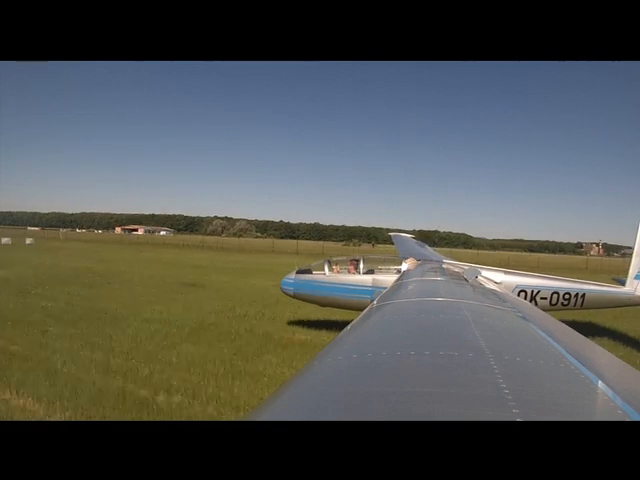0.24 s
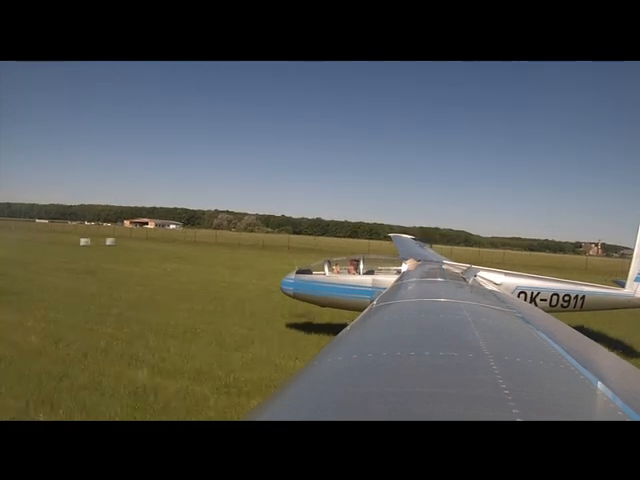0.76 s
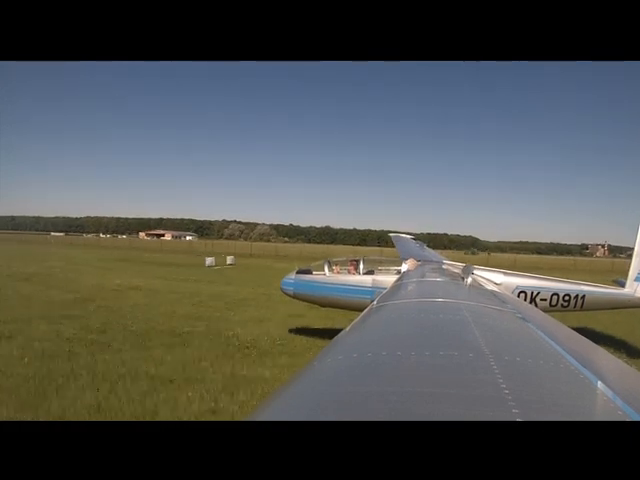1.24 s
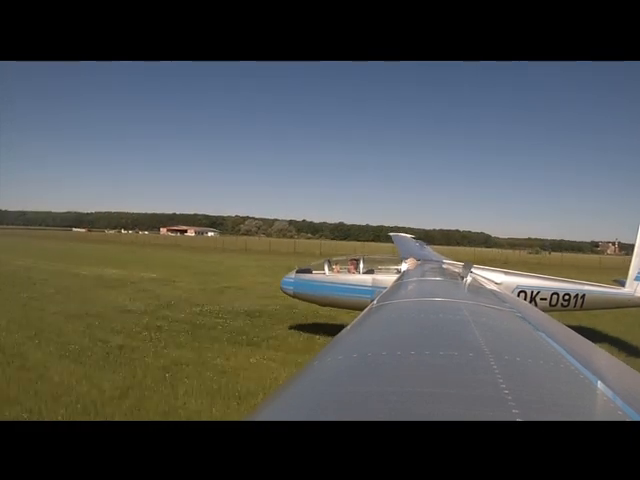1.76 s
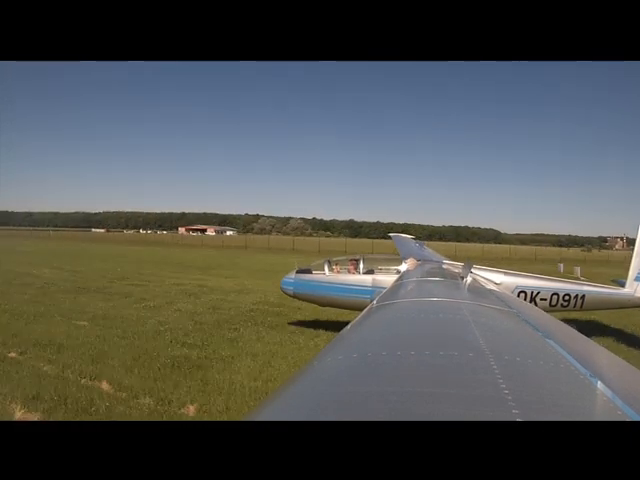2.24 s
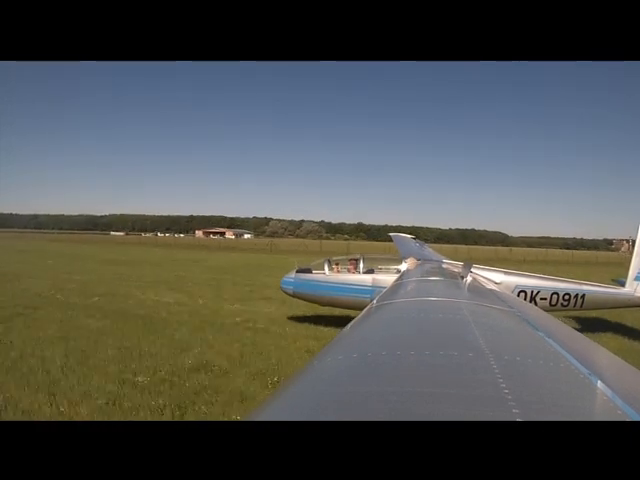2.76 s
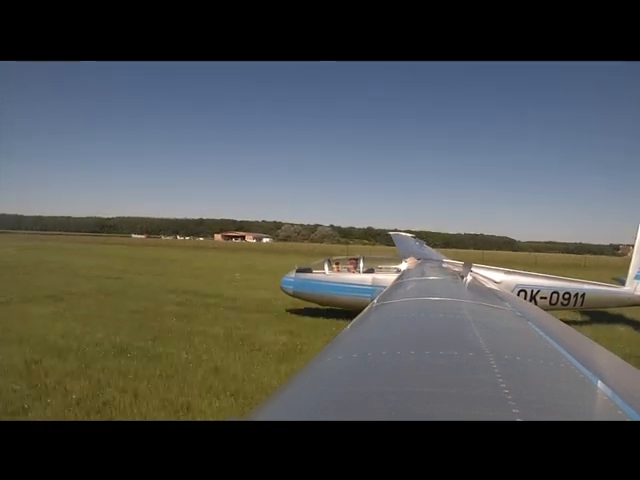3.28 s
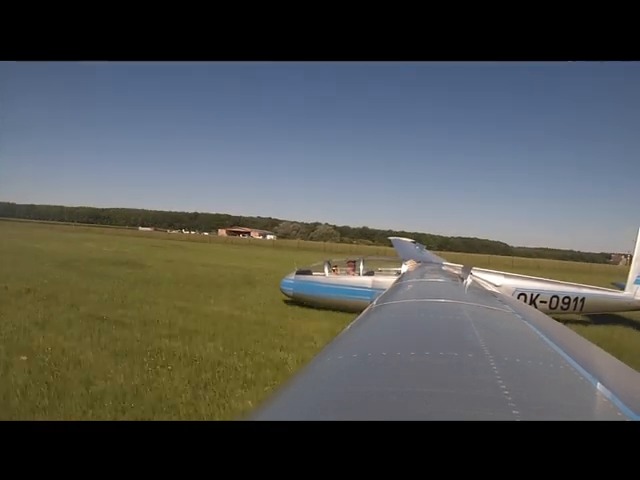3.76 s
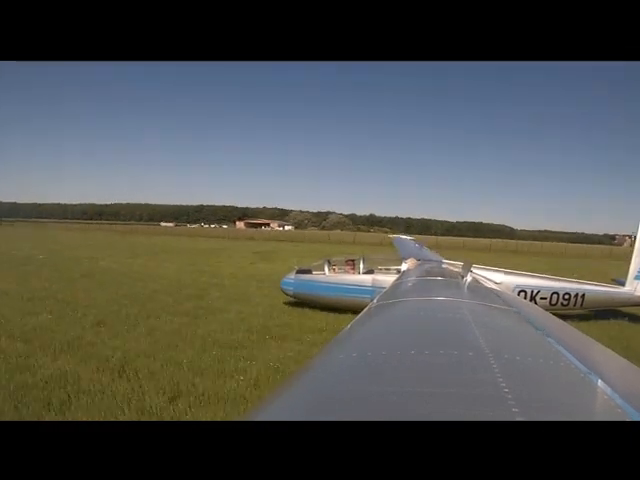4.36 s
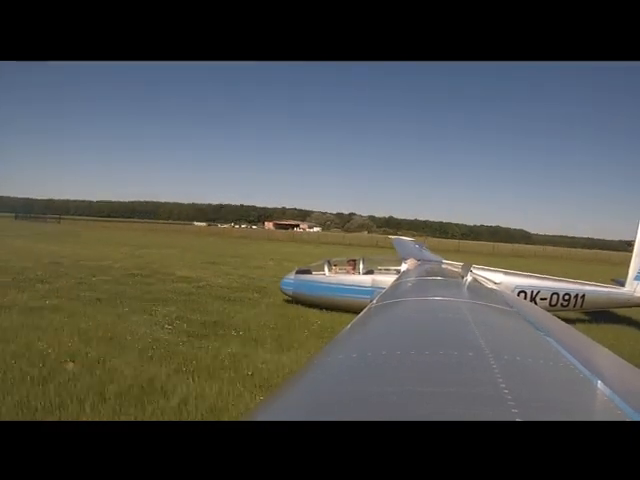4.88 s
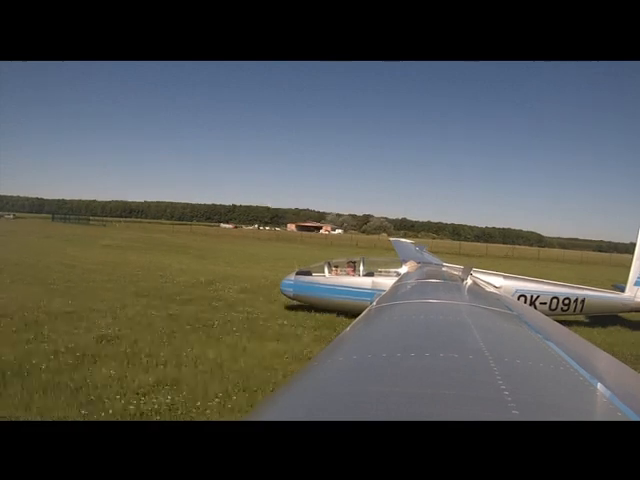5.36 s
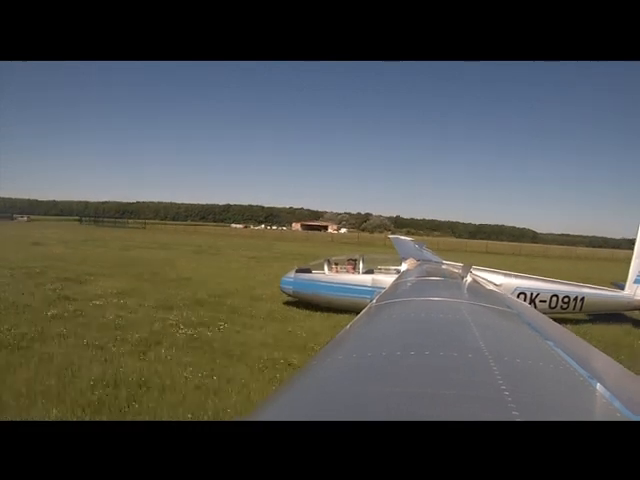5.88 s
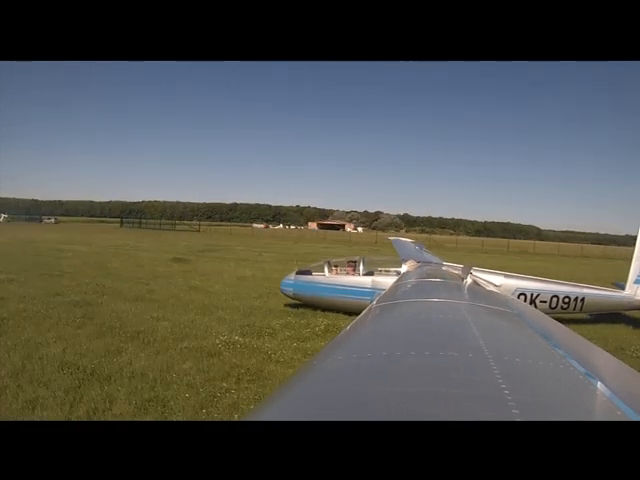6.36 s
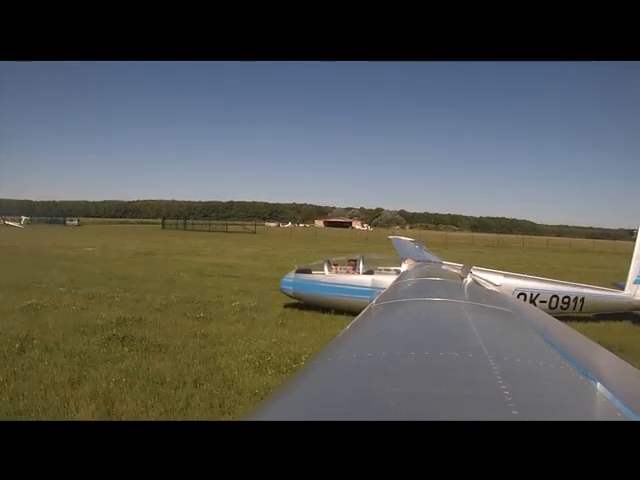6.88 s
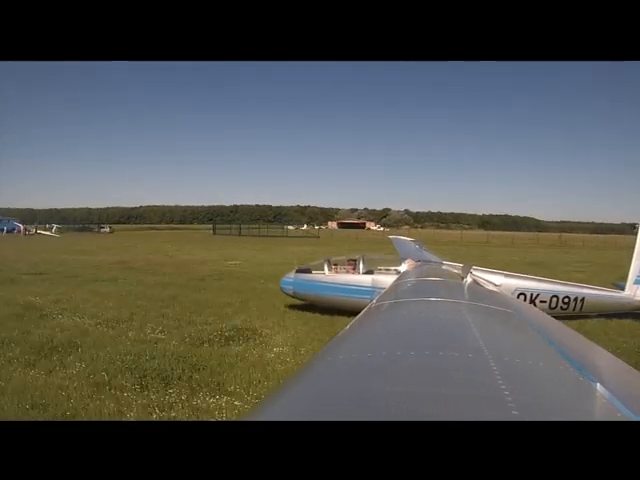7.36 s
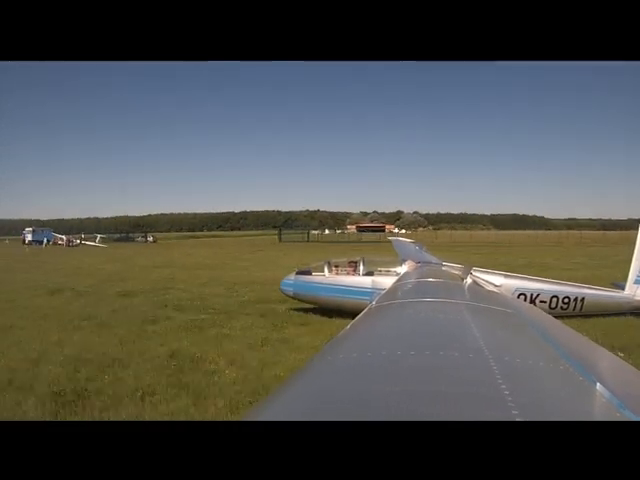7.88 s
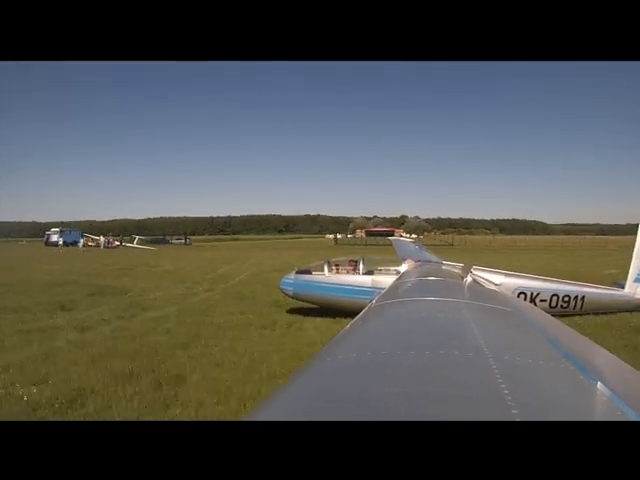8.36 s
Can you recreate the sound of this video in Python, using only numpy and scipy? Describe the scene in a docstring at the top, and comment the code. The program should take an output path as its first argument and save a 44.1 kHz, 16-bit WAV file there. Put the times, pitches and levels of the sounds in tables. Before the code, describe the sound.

Close on a glider's metal wing, a deep flutter and hollow drone roll across a grass field. A wheel brake sings a wavering high whine with gritty scraping, surging at each grab. Around four seconds it rasps and lets go; then the wheel rolls free, grass brushing softly, hard bumps thumping through the airframe, fittings ticking, wind buffeting the microphone.

```python
"""A glider's metal wing flutters, booms and drones as it rolls out over a grass field, heard on the wing.
The wheel brake scrapes, whines and rasps, then lets go, and grass brushes the wheel.
Hard bumps thump through the airframe, fittings tick, and wind buffets the microphone.
Ringing, rubbing and wind are shaped noise, the whine is two sines, and each thump is one smooth pulse.
A limiter ducks the whole sound after strong peaks."""
import sys
import numpy as np
from scipy import signal
from scipy.fft import rfft, irfft
from scipy.io import wavfile
from scipy.ndimage import uniform_filter1d

SR = 44100
rng = np.random.default_rng(int(sys.argv[2]) if len(sys.argv) > 2 else 0)


def inscribe(sig):
    """Save sig as 16-bit PCM at rate SR to the path in sys.argv[1].

    A 1-D sig is mono; a 2-D sig holds one channel per row.
    Samples are clipped to [-1, 1] before scaling.
    """
    pcm = np.round(np.clip(np.atleast_2d(sig).T, -1, 1) * 32767)
    wavfile.write(sys.argv[1], SR, pcm.astype(np.int16))


N = 380583
TIME = np.arange(N) / SR
FREQS = np.fft.rfftfreq(N, 1 / SR)

# Roughness of the turf, as the level at which it keeps the hollow wing droning,
# before hummocks and chance: (time [s], level [dB])
TURF = [(0, -28), (3.4, -26), (4.7, -25.5), (5.45, -28.5), (5.6, -30), (6.05, -32.5), (6.35, -27.5),
        (7.3, -28.5), (8.2, -21.5), (8.62, -25)]
# The wheel rides over hummocks:
# (time [s], length at half height [s], boom lift [dB], drone lift [dB], grass lift [dB])
HUMMOCKS = [(0.18, .16, 4, 3, 0), (1.08, 0.12, 5.5, -4, 0), (1.74, 0.22, 3, 1.5, 0),
            (2.26, 0.065, 4.5, 0.5, 0), (3.42, 0.23, 5.5, 0.5, 0), (3.72, 0.15, 6, 5.5, -6.5),
            (4.14, 0.052, 1.5, 4, 2), (4.3, 0.094, 4.5, 4, -0.5), (4.5, .06, 1, -0.5, 2.8),
            (4.61, 0.095, 2, 2, -1.5), (4.73, 0.045, -12, 8, 5), (4.85, 0.057, 6, 4, 1.5),
            (5.05, 0.052, 10, 1.5, 4.5), (5.25, 0.049, -6, 9.5, 0.5), (5.44, 0.11, -1, 10.5, 5),
            (6.0, 0.1, 4.5, -2, 0.5), (6.37, 0.25, 1.5, 6, 2.5), (6.53, 0.038, 3.5, 5, 3.5),
            (6.75, 0.17, 1, 6, 3.5), (7.04, 0.082, -3, 12, -0.5), (7.35, 0.044, -7, 6.5, 2),
            (7.62, 0.15, 5.5, -3.5, 2), (8.46, 0.11, 2, -0.5, 2.5)]
# The brake pad grabs; the whine takes the full lift, its octave and the scrape only a share:
# (time [s], length at half height [s], lift [dB])
GRABS = [(0.03, 0.087, 4), (0.37, 0.094, 5), (0.64, 0.094, 2), (1.01, 0.067, 3.5), (1.49, .2, 3.5),
         (1.95, 0.17, 6), (2.49, 0.15, 4.5), (2.66, 0.065, 3.5), (3.0, 0.12, 8.5), (3.92, 0.075, 10.5)]
# The pad loses its last touch: from, to [s]
PAD_CLEAR = [3.96, 4.06]


def gain_of(db):
    """Turns decibels into amplitude."""
    return 10 ** (np.asarray(db) / 20)


def evened(x):
    """Scales to an rms of 1."""
    return x / np.sqrt(np.mean(x ** 2) + 1e-20)


def curves(rows):
    """Draws each column of a timed table as a curve with a value at every sample."""
    s, *columns = np.transpose(rows)
    return [np.interp(TIME, s, c) for c in columns]


def swells(rows):
    """Bell-shaped swells from rows (time, length at half height, height, ..): one curve per height."""
    s, length, *heights = np.transpose(rows)
    coarse = TIME[::64]  # slow curves need few points
    bells = 0.5 ** ((2 * (coarse - s[:, None]) / length[:, None]) ** 2)
    return [np.interp(TIME, coarse, h @ bells) for h in heights]


def spectrum(points):
    """Joins a few (frequency, dB) points on a log-frequency axis."""
    hz, db = np.transpose(points)
    return np.interp(np.log(FREQS + 1), np.log(hz + 1), db)


def filtered(x, gain):
    """Applies one gain per frequency."""
    return irfft(rfft(x) * gain, N)


def noise(gain):
    """Coloured noise with an rms of 1."""
    return evened(filtered(rng.standard_normal(N), gain))


def wobble(rate_hz):
    """Slow chance movement up to about the given rate, with an rms of 1."""
    return noise(1 / (1 + (FREQS / rate_hz) ** 4))


def add(mix, s, sound):
    """Mixes a sound in at time s, cut off at the end of the mix."""
    part = mix[round(s * SR):][:len(sound)]
    part += sound[:len(part)]


def released():
    """How free the wheel is: 0 while the brake is on, 1 once it rolls free."""
    brake_off = [3.69, 3.88]  # from, to [s]
    return np.interp(TIME, brake_off, [0, 1])


def ringing(modes, hold=0.1):
    """Modes kept ringing by random jolts, at a level that stays fairly even over the hold time [s]."""
    gain = 0
    for hz, width, db in modes:
        gain = gain + gain_of(db) / (1 + (2 * (FREQS - hz) / width) ** 2) ** 1.55
    x = noise(gain)
    power = abs(uniform_filter1d(x ** 2, int(hold * SR)))
    return x / np.sqrt(power + 0.022)


def wing(bounce_db=-5, boom_uneven_db=1.5, drone_uneven_db=1.93, uneven_hz=12):
    """The wing flutters, booms and drones; once the brake lets go, the wheel bounces on its tyre."""
    # Modes of wing, airframe and tyre: (frequency [Hz], width [Hz], level within its group [dB])
    flutter_modes = [(23.87, 3.55, 2.5)]
    boom_modes = [(66.56, 11.1, -1.5), (104.3, 11, -18.5)]
    drone_modes = [(176.75, 23, 1), (152.5, 21.5, -5.5)]
    tyre_modes = [(39.8, 16.6, 0)]
    # Base levels: (with the brake on [dB], rolling free [dB])
    flutter_levels = (-24, -18.5)
    boom_levels = (-20.5, -25)
    sway_peak_s, sway_period_s, sway_db = 0.76, 1.22, 3

    free = released()
    boom_lift, drone_lift, _ = swells(HUMMOCKS)

    # Under braking the wing sways, and its flutter swells once in each sway.
    sway = sway_db * (1 - free) * np.cos(2 * np.pi * (TIME - sway_peak_s) / sway_period_s)
    bounce = gain_of(bounce_db) * free * ringing(tyre_modes, hold=0.32)  # level relative to the flutter
    flutter_level = np.interp(free, [0, 1], flutter_levels) + sway
    flutter = gain_of(flutter_level) * (ringing(flutter_modes, hold=0.117) + bounce)

    boom_level = np.interp(free, [0, 1], boom_levels) + boom_lift + boom_uneven_db * wobble(uneven_hz)
    boom = gain_of(boom_level) * ringing(boom_modes, hold=0.11)

    drone_level = curves(TURF)[0] + drone_lift + drone_uneven_db * wobble(uneven_hz)
    drone = gain_of(drone_level) * ringing(drone_modes, hold=0.12)
    return flutter + boom + drone


def skin_gain():
    """The colour that the metal wing gives to whatever rubs or ticks on it."""
    # Rubbing as the wing passes it on: (frequency [Hz], relative level [dB per Hz])
    rub_colour = [(50, -3), (100, 1), (200, -5), (300, -8), (620, -8), (820, -10), (980, -14), (1500, -6.5),
                  (2300, -12.5), (3200, -23), (5400, -29), (5900, -31), (8200, -29.5), (9900, -40),
                  (12500, -41), (15000, -54)]
    # Resonances of the metal skin: (frequency [Hz], width [Hz], lift [dB])
    skin = [(240.3, 12.3, 6), (1139, 52, 5), (1420, 356, 8), (1838, 56, 4), (2227, 42, 4.5), (2565, 166, 5),
            (2970, 250, 3), (3550, 126, 4.5), (4270, 126, 5.5), (4814, 240, 6), (5340, 360, 7),
            (6940, 1240, 3.5), (8100, 260, 2), (9700, 400, 3.5), (11160, 800, 4)]
    lift_db = sum(db / (1 + (2 * (FREQS - hz) / width) ** 2) for hz, width, db in skin)
    return evened(gain_of(spectrum(rub_colour) + lift_db))


def rubbing(grab_share=0.41, judder_db=1.15, grit_db=1.0, treble_hz=3100, drag_db=-14,
            treble_start_db=-0.74, brighten_db_per_s=0.47):
    """The brake scrapes ever brighter, then drags lightly until it clears; grass brushes the free wheel."""
    # How hard the brake scrapes, before grabs and release: (time [s], level [dB])
    scrape = [(0, -20), (1.2, -21), (1.8, -19.5), (2.6, -21), (3.2, -19), (3.42, -22), (3.7, -21)]
    # Grass brushing the wheel, before the hummocks: (time [s], level [dB])
    grass_levels = [(3.9, -36), (4.4, -34.5), (5.0, -32), (5.3, -36.5), (5.7, -39), (6.6, -39), (7.4, -39),
                    (8.6, -37.5)]
    # With the brake off, grass on the tyre shifts the colour: (frequency [Hz], shift [dB])
    grass_tint = [(200, -1.5), (380, 1), (600, -0.5), (1100, 1), (1500, -2.5), (3000, 1), (6000, 0),
                  (14000, -0.5)]

    free = released()
    _, _, grass_lift = swells(HUMMOCKS)
    touching = np.interp(TIME, PAD_CLEAR, [1, 0])

    brake_level = curves(scrape)[0] + grab_share * swells(GRABS)[0] + drag_db * free
    brake = touching * gain_of(brake_level) * noise(skin_gain())
    grass_level = curves(grass_levels)[0] + grass_lift
    grass = np.sqrt(free) * gain_of(grass_level) * noise(skin_gain() * gain_of(spectrum(grass_tint)))
    hiss = brake + grass

    fizz = filtered(hiss, 1 / (1 + (treble_hz / (FREQS + 1)) ** 12))  # the treble part
    body = (hiss - fizz) * gain_of(grit_db * wobble(180))  # below the treble it is grittier
    bright = gain_of((1 - free) * (treble_start_db + brighten_db_per_s * TIME))
    return (body + bright * fizz) * gain_of(judder_db * wobble(13.8))


def whine(jitter_hz=2.51, low_flicker_db=-0.8, octave_flicker_db=1.83, octave_grab_share=0.85,
          sharpen_hz_per_db=0.46):
    """The brake sings, louder and sharper at each grab; its octave, near a skin resonance, flickers more."""
    # Strength between grabs: (time [s], fundamental level [dB], octave level [dB])
    strength = [(0, -27.5, -20), (1.4, -28.5, -21.5), (1.78, -31, -25), (2.3, -28.5, -23.5),
                (2.85, -29.5, -26), (3.04, -31.5, -27.5), (3.07, -38.5, -37), (3.62, -37.5, -40),
                (3.78, -49, -55), (4.0, -45, -49)]
    # Pitch between grabs: (time [s], frequency [Hz])
    pitch = [(0, 678), (0.3, 677), (0.85, 672), (1.25, 674.5), (1.7, 670.5), (2.0, 673), (3.0, 675.5)]

    first_db, second_db = curves(strength)
    grab = swells(GRABS)[0]
    hz = curves(pitch)[0] + sharpen_hz_per_db * grab + jitter_hz * wobble(43)
    phase = 2 * np.pi * np.cumsum(hz) / SR

    low_level = first_db + grab + low_flicker_db * wobble(35)
    low = gain_of(low_level) * np.sin(phase)
    # The octave flickers by chance, faster and deeper than the fundamental.
    octave_level = second_db + octave_grab_share * grab + octave_flicker_db * wobble(71)
    octave = gain_of(octave_level) * np.sin(2 * phase)
    touching = np.interp(TIME, PAD_CLEAR, [1, 0])
    return np.sqrt(2) * (low + octave) * touching  # the root makes the levels rms levels


def rasp(rasp_db=-27.0, flicker_db=2.0, flicker_hz=25):
    """As the whine breaks down the pad chatters: wavering noise bands, the strongest near its octave."""
    # Skin resonances that the pad rasps in: (frequency [Hz], width [Hz], relative level [dB])
    rasp_modes = [(408, 100, -4), (1454, 182, 0)]
    # When it rasps: (time [s], length at half height [s], share of full amplitude)
    rasp_swell = [(3.28, 0.58, 0.84)]
    level = gain_of(rasp_db + flicker_db * wobble(flicker_hz))
    return level * swells(rasp_swell)[0] * (1 - released()) * ringing(rasp_modes)


def bumps(ring_hz=182, ring_t60=0.16, rise=0.0055, crunch_hz=450, crunch_length=0.0083):
    """Each bump crunches the turf and gives one heavy shove; the wing rings with it and fades (times [s])."""
    # The wheel hits bumps; the ring level is before its soft rise and its decay:
    # (time [s], thump level [dB], thump length [s], wing ring level [dB], crunch level [dB])
    bump_rows = [(3.672, -5.5, 0.024, -9, -25), (5.066, -7, 0.035, -29, -31),
                 (5.175, -5.5, 0.0083, -28, -34), (5.411, -0.5, 0.023, -17, -44),
                 (6.852, 0.5, .015, -31, -37), (7.704, -4.5, 0.0077, -17, -33), (7.732, 2, 0.015, -38, -40),
                 (8.12, -12, 0.0055, -2, -25), (8.139, 3.5, 0.012, -29, -29),
                 (8.42, -12, 0.013, -18, -29.5), (8.511, 3.5, 0.0157, -41, -27)]
    out, crush = np.zeros(N), np.zeros(N)
    t = np.arange(SR // 3) / SR
    ring = np.sin(2 * np.pi * ring_hz * t) * gain_of(-60 * t / ring_t60) * (1 - np.exp(-t / rise))
    for s, thump_db, length, ring_db, crunch_db in bump_rows:
        shove = np.sin(np.pi * np.minimum(t / length, 1)) ** 2
        add(out, s, gain_of(ring_db) * ring - gain_of(thump_db) * shove)
        # The crunch is strongest in the middle of the shove.
        crush += gain_of(crunch_db) * np.exp(-abs(TIME - s - length / 2) / crunch_length)
    crunch_colour = FREQS / (FREQS + 150) / (1 + (FREQS / crunch_hz) ** 3)
    return out + crush * noise(crunch_colour)


def ticks(decay=0.0054, dull_hz=2600):
    """Loose fittings tick: short bursts of noise, coloured by the skin and dulled (decay [s])."""
    # Ticks, mostly on the bumps: (time [s], level [dB])
    tick_rows = [(5.048, -25.5), (5.575, -28), (5.643, -31), (6.852, -29.5), (7.821, -32), (8.141, -29),
                 (8.51, -30)]
    strength, t = np.zeros(N), np.arange(SR // 10) / SR
    for s, db in tick_rows:
        add(strength, s, gain_of(db) * np.exp(-t / decay))
    return strength * noise(skin_gain() / np.sqrt(1 + (FREQS / dull_hz) ** 2))


def wind(wind_db=-32, gust_db=3.5, shake_share=0.37):
    """Lumpy low noise of wind buffeting the microphone, stronger when the wing drones harder."""
    # Colour of the wind on the microphone: (frequency [Hz], relative level [dB per Hz])
    wind_colour = [(12, -12), (30, -4.5), (80, -2.5), (130, -10), (210, -7.5), (320, -19.5), (400, -18.5),
                   (480, -24), (900, -39), (3000, -74)]
    _, drone_lift, _ = swells(HUMMOCKS)
    swell = gain_of(gust_db * wobble(19.5) + shake_share * (curves(TURF)[0] + drone_lift))
    return gain_of(wind_db) * evened(noise(gain_of(spectrum(wind_colour))) * swell)


def scene():
    """Everything meets at the wing-mounted microphone."""
    mix = wing() + rubbing() + whine() + rasp() + bumps() + ticks() + wind()
    return mix[None]


def record(dry, ceiling_db=-2.5, recovery_db_per_s=32, low_cut_hz=12, edge_hz=15050):
    """A limiter clamps just after each peak and recovers slowly; then the lowest and highest sound is cut."""
    over_db = np.maximum(20 * np.log10(abs(dry[0]) + 1e-9) - ceiling_db, 0)
    # Hold the largest excess so far, letting it fall at the recovery rate.
    fall = TIME * recovery_db_per_s
    held_db = np.maximum.accumulate(over_db + fall) - fall
    duck_db = signal.lfilter(np.ones(56) / 56, 1, held_db)  # takes 56 samples to clamp fully
    limited = dry * gain_of(-duck_db)

    low_cut = signal.butter(2, low_cut_hz, "high", fs=SR, output="sos")
    band_limit = signal.firwin(511, edge_hz, window=("kaiser", 9), fs=SR)
    return signal.oaconvolve(signal.sosfilt(low_cut, limited), band_limit[None], "same")


dry = scene()
out = record(dry)
inscribe(out)
```